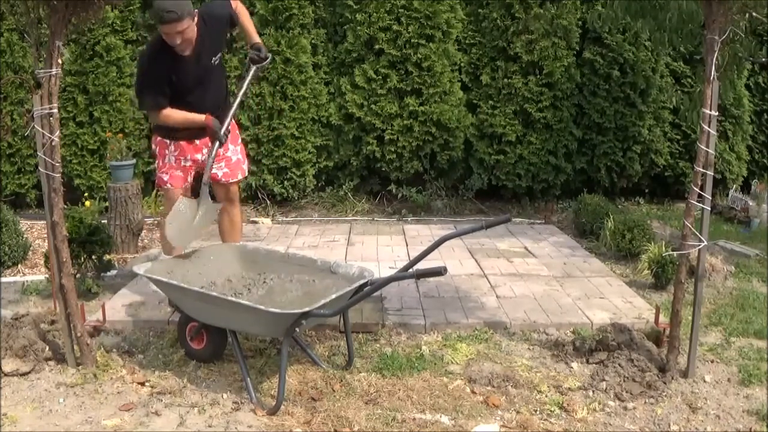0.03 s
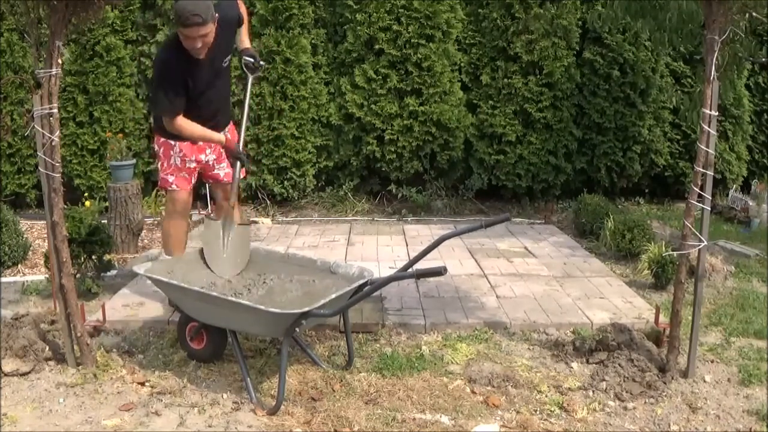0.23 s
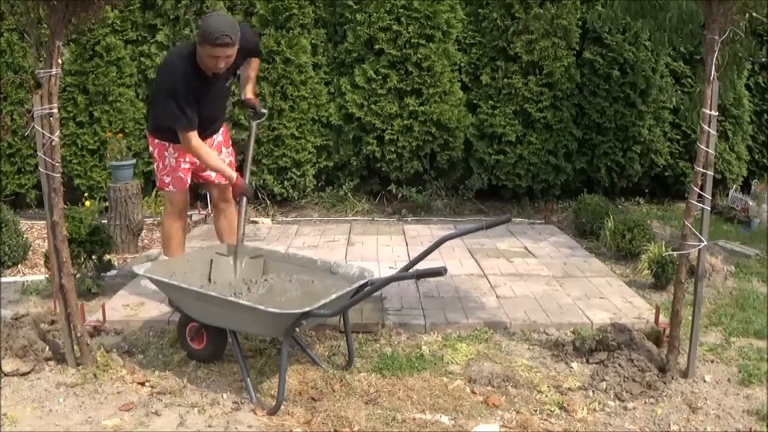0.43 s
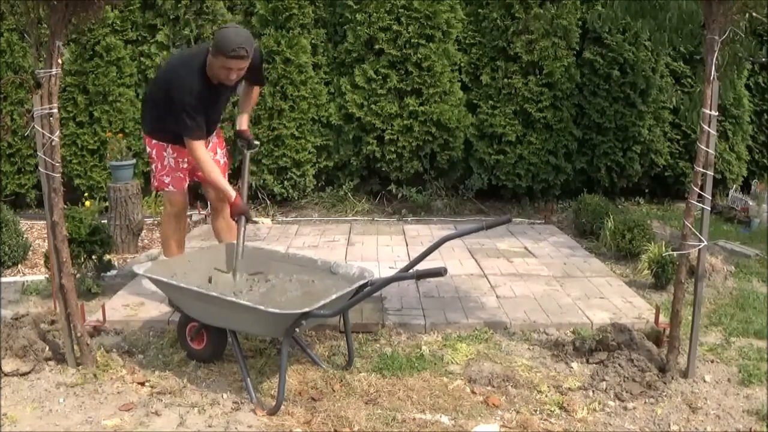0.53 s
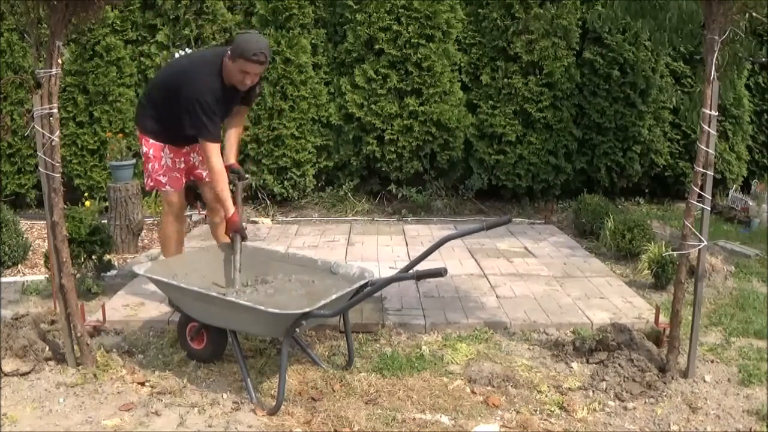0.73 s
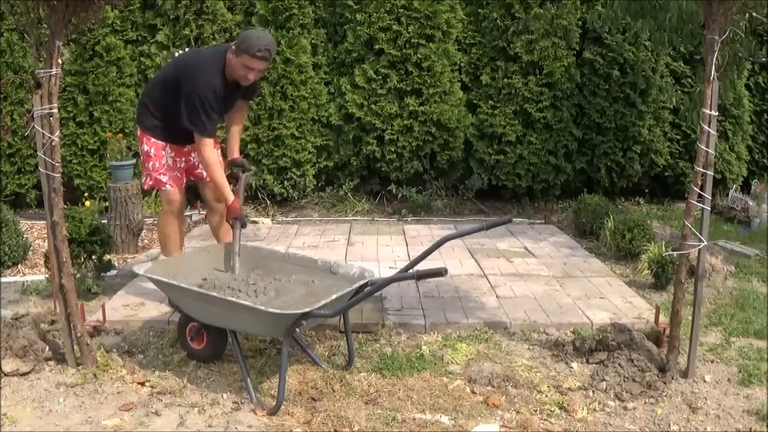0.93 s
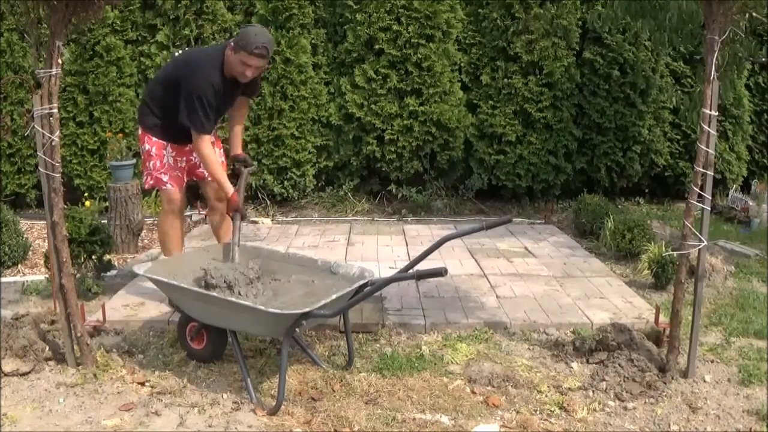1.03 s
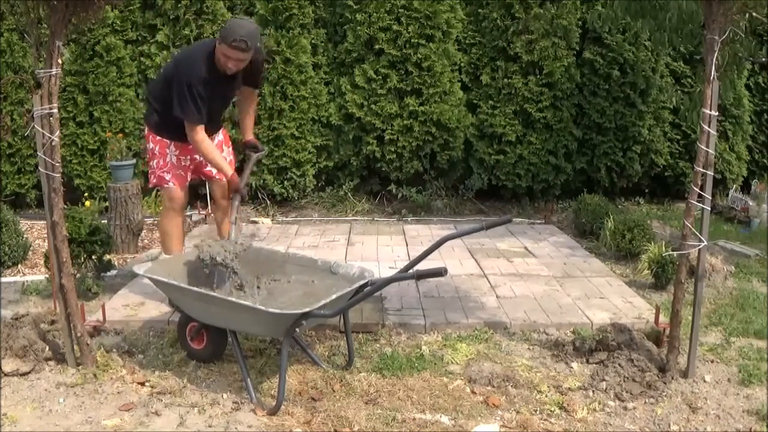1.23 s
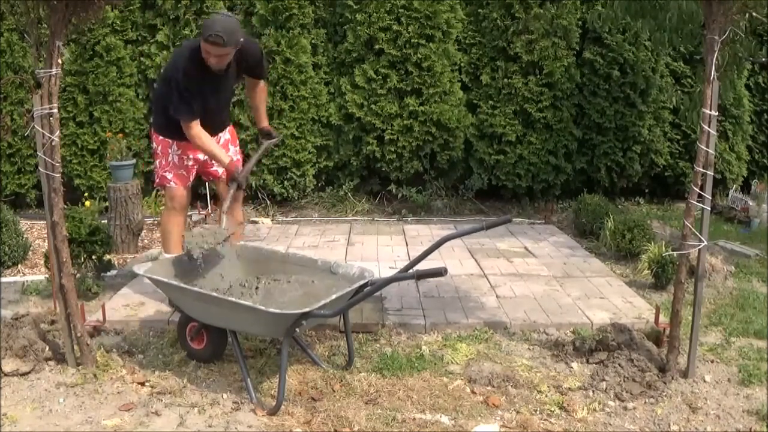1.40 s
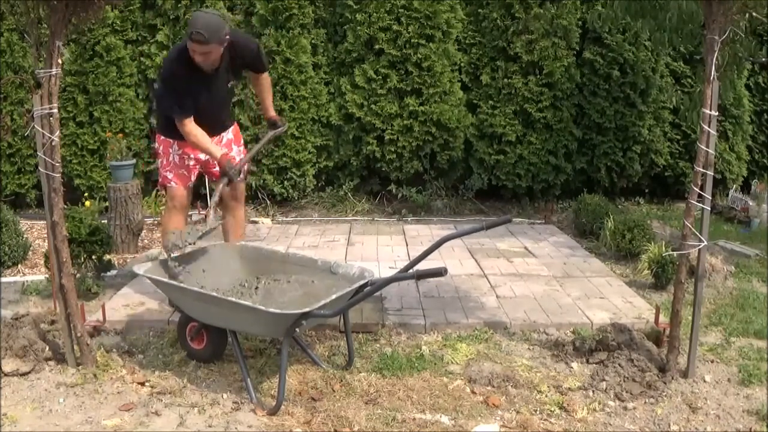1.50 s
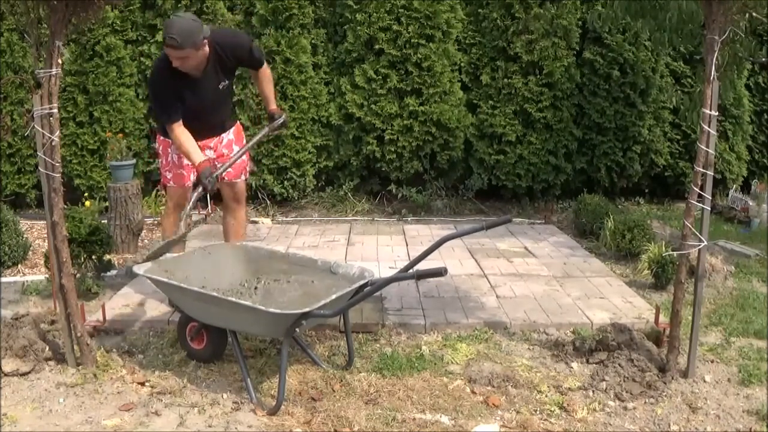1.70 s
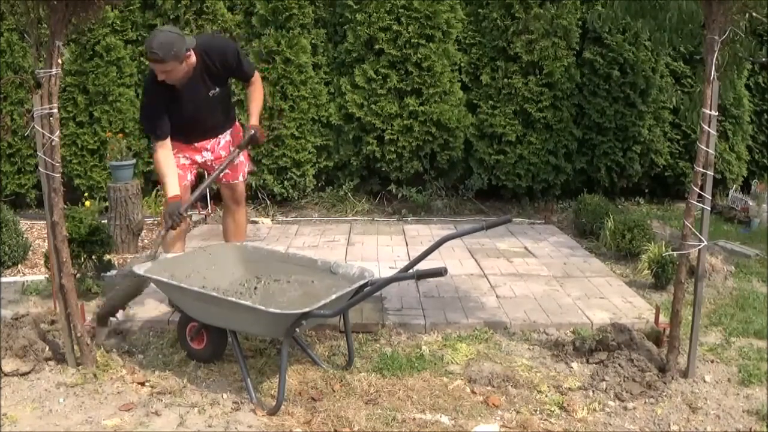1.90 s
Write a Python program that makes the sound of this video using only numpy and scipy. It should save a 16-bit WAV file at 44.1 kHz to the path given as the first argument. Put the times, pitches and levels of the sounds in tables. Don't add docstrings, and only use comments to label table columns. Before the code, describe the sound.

One harsh gravelly shovel thrust with wet plops, a soft sliding pause, then scattered splats and light clanks on a steel wheelbarrow tub, heard from a few metres away in a quiet garden with faint small birds.

```python
import sys
import numpy as np
from scipy import signal
from scipy.fft import rfft, irfft, next_fast_len
from scipy.io import wavfile
from scipy.ndimage import uniform_filter1d, map_coordinates

SR = 44100
rng = np.random.default_rng(int(sys.argv[2]) if len(sys.argv) > 2 else 0)


def voltage_ratio(decibels):
    exponent = np.asarray(decibels, float) / 20
    return 10 ** exponent


def materialize(psi):
    bounded = np.clip(np.atleast_2d(psi).T, -1, 1)
    quanta = np.round(bounded * 32767).astype(np.int16)
    wavfile.write(sys.argv[1], SR, quanta)


N = 85995

# time_s, grinding_db, pocket_over_grinding_db, pocket_pitch_hz
THRUST = [
    (.2165, -25.5, -30, 800),
    (.218, -20, -25, 830),
    (.287, -17.5, -15, 774),
    (.337, -18.5, 2, 770),
    (.351, -27, 6.5, 730),
    (.47, -23.5, 2, 582),
    (.54, -28, 0.5, 558),
    (.69, -30.5, -2.5, 523),
    (.735, -57, -5, 497),
]
# start_s, peak_db, length_s, thud_db, brightness_db
CATCHES = [(.247, -22, 0.036, -28, 8), (.32, -31, 0.0039, -24, 9), (.356, -18.5, 0.0044, -21, -1),
           (.394, -17, 0.005, -5, 3), (.418, -23, 0.0086, -15, -20), (.46, -20, 0.013, -22, -0.2),
           (.493, -22, 0.0043, -13, -5.5), (.512, -30, 0.0089, -15, -12), (.526, -27, 0.019, -11, -2),
           (.5645, -30, 0.0044, -20, -7), (.5875, -26, 0.014, -20, 0), (.657, -30, .015, -21, -17),
           (.68, -29, 0.013, -24, 0)]
# start_s, peak_db, length_s, thud_db, brightness_db
SPLATS = [(.2155, -15, 0.014, -25, 2), (1.258, -43, 0.0037, -20, 3), (1.266, -39, 0.0048, -24, 4),
          (1.325, -35.5, 0.0091, -27, 3), (1.376, -33, 0.0045, -26, 19), (1.388, -35, .003, -13, 16),
          (1.404, -25, 0.0037, -5, -3), (1.451, -36.5, 0.0064, -19, 5), (1.479, -22, 0.0084, 9.5, 0.5),
          (1.494, -31.5, 0.0062, 4, -2), (1.507, -48, 0.01, 14, -2), (1.524, -36.5, 0.017, 1, 1),
          (1.539, -21, 0.012, -5, 0), (1.548, -25, 0.014, -3, -3.5), (1.5765, -25, 0.004, -10, 0),
          (1.59, -27.5, 0.0039, -29, 4), (1.601, -33, 0.0035, -21, -1), (1.646, -28, 0.0057, -3.5, 3),
          (1.654, -17, .0017, -17, 4.5), (1.672, -39, 0.0084, -9, 12), (1.917, -25.5, 0.0014, -26, 14),
          (1.947, -20, .005, -40, 2)]
# start_s, peak_db, pitch_hz, length_s
PLOPS = [(.218, -35.5, 471, 0.016), (.282, -25, 770, 0.043), (.313, -20, 707, 0.0072),
         (.33, -16.5, 823, 0.012), (.356, -21, 840, 0.0042), (.362, -17, 680, 0.009),
         (.379, -19.5, 571, 0.018), (.391, -28, 800, 0.009), (.403, -25, 760, 0.012),
         (.404, -20.5, 1043, 0.016), (.418, -8, 732, 0.0079), (.418, -17.5, 1060, .007),
         (.43, -18, 575, 0.01), (.453, -8.5, 562, 0.011), (.51, -34, 580, 0.017), (.529, -24, 615, 0.011),
         (.587, -24, 497, 0.012), (.6, -31, 720, 0.0087), (.606, -28.5, 374, 0.029),
         (.618, -25, 485, 0.021), (.682, -23.5, 499, 0.016)]
# start_s, peak_db, pitch_hz, length_s
SINGS = [(.002, -53, 1543, 0.022), (.215, -19, 10450, 0.0071), (.215, -19.5, 7410, 0.011),
         (.243, -29, 1830, 0.041), (.286, -19.5, 2124, 0.023), (.308, -16, 4320, 0.013),
         (.31, -26.5, 1670, 0.019), (.352, -18, 2350, .01), (.656, -27.5, 3056, 0.01),
         (.675, -23, 1495, 0.0088), (.755, -46, 1300, 0.026), (.81, -46.5, 1280, 0.045),
         (.815, -46, 4000, .025), (.86, -47, 2340, .06), (.96, -50, 2290, 0.044), (.965, -50, 4370, 0.079),
         (1.01, -51, 3780, .03), (1.06, -51, 1766, 0.053), (1.07, -49, 2610, .035), (1.115, -49, 6270, .04),
         (1.15, -51, 7450, .025), (1.185, -45.5, 6250, .02), (1.215, -45, 7150, 0.018),
         (1.263, -38.5, 4500, 0.011), (1.404, -34, 1720, .008), (1.405, -32, 2270, 0.0053),
         (1.545, -28.5, 1577, 0.011), (1.646, -41, 1800, 0.0066), (1.654, -25, 2980, 0.0049),
         (1.654, -25, 4030, 0.0048), (1.654, -21.5, 6240, 0.003)]
# time_s, level_db, wet_slop_over_it_db, brightness_db
SLIDE = [(.66, -34.5, 1, -5), (.72, -39, -3, -4), (.76, -45, 1.5, -0.5), (.85, -41.5, -2.5, 0.5),
         (.95, -45.5, -1.5, 1), (1.15, -45, -21.5, 5), (1.3, -52, -11.5, 8), (1.62, -53, 0, 4.5),
         (1.74, -58.5, -4.5, 7.5), (1.95, -40.5, -29, 9)]
# time_s, pitch_hz, level_db
SUCK = [
    (.68, 167, -69.5),
    (.84, 139, -64),
    (.92, 121, -70),
    (1.0, 117, -69),
]
# time_s, pitch_hz, level_db
GULP = [
    (.77, 339, -57.5),
    (.82, 301, -61.5),
    (.9, 342, -54),
    (.96, 367, -64),
]
# pitch_hz, level_db (per Hz)
GRIND_COLOUR = [(120, -13.5), (300, -9), (900, -3.5), (1300, -6.5), (2100, -1), (4400, 0.5), (6500, -4),
                (10000, -2.5), (11500, -6.5)]
# pitch_hz, level_db (per Hz)
SAND_COLOUR = [(200, -12), (700, -9), (1900, -0.5), (4000, -6.5), (7000, -9), (11500, -9)]
# pitch_hz, level_db (per Hz)
AIR_COLOUR = [(40, -52), (70, -17), (1450, -8.5), (3550, -4), (8000, -14.5), (11500, -25)]
# pitch_hz, width_hz, level_db
BLADE = [(1660, 35, -3), (1870, 30, 0), (2110, 25, 2), (2450, 60, -3), (4300, 120, -9), (5410, 40, -8)]
# pitch_hz, level_db, fade_by_60_db_s
TUB = [(151, -25.5, .06), (308, -10, 0.027), (460, 4.5, 0.022), (626, -4, 0.023), (718, 5, 0.022),
       (927, -2.5, 0.02), (1167, -2.5, 0.019), (1464, -8, 0.019), (2580, -14, .03)]
# time_s, pitch_hz, level_db
BIRDS = [
    [(0, 4180, -46), (.04, 4210, -56), (.07, 4500, -59), (.12, 4770, -49.5)],
    [(.12, 5270, -58), (.14, 4850, -53)],
    [(.08, 3570, -64), (.157, 3590, -60), (.21, 3690, -51.5)],
    [(.014, 7960, -59), (.024, 8130, -45), (.035, 8140, -63), (.1, 7850, -60), (.115, 7500, -57.5),
     (.135, 7800, -61), (.175, 8200, -60), (.21, 8200, -52.5)],
    [(.085, 2650, -55), (.15, 2650, -61), (.2, 2900, -61)],
    [(1.423, 8020, -56), (1.445, 8200, -46), (1.457, 8260, -63), (1.472, 8150, -44), (1.49, 8150, -53),
     (1.525, 8100, -44)],
    [(1.74, 8130, -59), (1.765, 7130, -55), (1.79, 6470, -45.5), (1.812, 7270, -50), (1.865, 6860, -46),
     (1.897, 7100, -48)],
    [(1.33, 3360, -57), (1.45, 3470, -54)],
]
FLUTTER_HZ = [25, 120, 35, 140, 90, 80, 200, 60]
# pitch_hz, likeness (0 to 1)
BARROW_ALIKE = [(500, 0.99), (3000, 0.98), (10000, 0.94)]
# pitch_hz, likeness (0 to 1)
GARDEN_ALIKE = [(100, 0.66), (10000, 0.65)]

BRIGHT_HZ = 4500


def unit(x):
    return x / np.sqrt(np.mean(x ** 2) + 1e-20)


def along(points, hz):
    f, v = np.transpose(points)
    return np.interp(np.log(hz + 1), np.log(f + 1), v)


def curves(rows):
    s, *columns = np.transpose(rows)
    t = np.arange(N) / SR
    inside_s = np.minimum(t - s[0] + 0.0055, s[-1] - t + 0.0038)
    gate = np.clip(inside_s / 0.0054, 0, 1)
    return [gate] + [np.interp(t, s, column) for column in columns]


def wobble(rate):
    knots = rng.standard_normal(int(N * rate / SR) + 4)
    return map_coordinates(knots, [np.arange(N) * rate / SR])


def filtered(x, response):
    m = next_fast_len(N + SR // 2)
    return irfft(rfft(x, m) * response(np.fft.rfftfreq(m, 1 / SR)), m)[..., :N]


def bright_part(x):
    return filtered(x, lambda f: 1 / (1 + (BRIGHT_HZ / (f + 1)) ** 4))


def dull_part(x):
    return filtered(x, lambda f: 1 / (1 + (f / BRIGHT_HZ) ** 4))


def ringing(peaks):
    def response(f):
        return sum((-1) ** k * voltage_ratio(db) * 1j * f * width / (hz * hz - f * f + 1j * f * width)
                   for k, (hz, width, db) in enumerate(peaks))
    return response


def grit(colour, lumpy_db, patchy_db):
    z = signal.stft(rng.standard_normal(N + 512), nperseg=256)[2]
    patches = uniform_filter1d(rng.standard_normal(z.shape), size=5, axis=0)
    patches = uniform_filter1d(patches, size=5, axis=1)
    noise = signal.istft(z * voltage_ratio(patchy_db * unit(patches)), nperseg=256)[1][:N]
    clumps = voltage_ratio(lumpy_db * (wobble(700) + 0.71 * wobble(89.6)))
    return unit(filtered(noise, lambda hz: voltage_ratio(along(colour, hz))) * clumps)


def gurgle(hz, count, cycles, scatter, size_db):
    u, t = rng.random((count, 2)), np.arange(1200) / SR
    at = (u[:, 0] * (N - 1)).astype(int)
    f = (hz[at] * np.exp(scatter * rng.standard_normal(count)))[:, None]
    size = voltage_ratio(-size_db * np.log(u[:, 1:2] + 1e-4))
    age = f * t / cycles
    tone = size * age * np.exp(-age) * np.sin(2 * np.pi * f * t)
    places = at[:, None] + np.arange(1200)
    return unit(np.bincount(places.ravel(), tone.ravel())[:N])


def thrust():
    gate, db, pocket_db, pocket_hz = curves(THRUST)
    grind = grit(GRIND_COLOUR, lumpy_db=1.4, patchy_db=1.25)
    free = np.clip((0.373 - np.arange(N) / SR) / 0.018, 0.2, 1)
    blade = voltage_ratio(-9) * free * unit(filtered(grind, ringing(BLADE)))
    pocket = gurgle(pocket_hz, count=2200, cycles=2.6, scatter=0.08, size_db=1.5)
    overtone = gurgle(1.74 * pocket_hz, count=1500, cycles=1.42, scatter=0.302, size_db=2.0)
    pocket = pocket + voltage_ratio(-2) * overtone
    return gate * voltage_ratio(db) * (grind + squeaks() + blade + voltage_ratio(pocket_db - 4) * pocket)


def squeaks():
    return voltage_ratio(-7) * gurgle(np.full(N, 3600.), count=1100, cycles=8, scatter=0.5, size_db=1.8)


def tones(rows, wander):
    out, drift = np.zeros(N + SR), wobble(160)
    swell = 0.36
    for s, db, hz, length in rows:
        i = round(s * SR)
        u = np.arange(round(2 * length * SR)) / (SR * length * swell)
        phase = 2 * np.pi * np.cumsum(hz * (1 + wander * drift[i:i + len(u)])) / SR
        out[i:i + len(u)] += voltage_ratio(db) * (u * np.exp(1 - u)) ** 1.16 * np.sin(phase)
    return out[:N]


def bursts(rows):
    t, out = np.arange(SR // 10) / SR, np.zeros(N + SR)
    crunch = grit(GRIND_COLOUR, lumpy_db=2.2, patchy_db=1.8)
    high, low = bright_part(crunch), dull_part(crunch)
    for k, (s, db, length, thud_db, bright_db) in enumerate(rows):
        i = round(s * SR)
        part = slice(k * 2500, k * 2500 + len(t))
        tail_s = 0.029 * (length / 0.0042) ** 0.5
        rise = 1 - np.exp(-t / 0.0003)
        shape = rise * voltage_ratio(-60 * np.maximum(t - 0.71 * length, 0) / tail_s)
        shape = shape * (1 + voltage_ratio(-0.5) * np.exp(-t / 0.00013))
        mix = low[part] * voltage_ratio(-bright_db) + high[part] * voltage_ratio(bright_db)
        mix = mix * np.linalg.norm(shape) / np.linalg.norm(shape * mix)
        out[i:i + len(t)] += voltage_ratio(db) * (shape * mix + voltage_ratio(thud_db) * tub(t))
    return out[:N]


def tub(t):
    rings = sum(voltage_ratio(db + rng.normal(0, 1) - 60 * t / t60) * np.sin(2 * np.pi * hz * t)
                for hz, db, t60 in TUB)
    return rings * (1 - np.exp(-t / 0.0012))


def slide():
    gate, db, slop_db, bright_db = curves(SLIDE)
    slop = gurgle(np.full(N, 800.), count=1500, cycles=3.3, scatter=0.548, size_db=-1.0)
    sand = grit(SAND_COLOUR, lumpy_db=2.0, patchy_db=1.0)
    sand = sand + (voltage_ratio(bright_db) - 1) * bright_part(sand)
    return gate * voltage_ratio(db + 0.58 * wobble(14.9)) * (sand + 0.56 * squeaks() + voltage_ratio(slop_db) * slop)


def whistle(rows, flutter_hz, rate):
    gate, hz, db = curves(rows)
    phase = 2 * np.pi * np.cumsum(hz + flutter_hz * wobble(rate)) / SR
    return gate * voltage_ratio(db + 3.5 + flutter_hz / 60 * wobble(rate)) * np.sin(phase)


def birds():
    return sum(whistle(rows, flutter, 450) for rows, flutter in zip(BIRDS, FLUTTER_HZ))


def garden_air():
    return voltage_ratio(-50.5 + 1.8 * wobble(6.4)) * grit(AIR_COLOUR, lumpy_db=0.6, patchy_db=0.5)


def yard(x):
    t = np.arange(SR // 4) / SR
    tail = rng.standard_normal((2, len(t))) * voltage_ratio(-60 * t / 0.13)
    late = np.pad(x, (300, 0))[None]
    return signal.fftconvolve(late, tail / np.linalg.norm(tail[0]), axes=1)[:, :N]


def left_right(x, alike):
    def difference(hz):
        angle = np.arccos(np.clip(along(alike, hz), 0, 1))
        return 1.4j * np.cos(hz / 70) * np.tan(angle / 2)
    side = filtered(x, difference)
    return np.array([x + side, x - side])


def low_cut(x):
    return filtered(x, lambda f: (1j * f / (317 + 1j * f)) ** 2)


def scene():
    shovel = thrust() + bursts(CATCHES) + bursts(SPLATS)
    shovel = shovel + tones(PLOPS, wander=0.032) + tones(SINGS, wander=0.014)
    shovel = low_cut(shovel)
    mix = low_cut(slide()) + whistle(SUCK, 8.4, 40.9) + whistle(GULP, 19.0, 70.3)
    calls = birds()
    near = left_right(shovel, BARROW_ALIKE) * voltage_ratio([[0.55], [-0.55]]) + left_right(mix, BARROW_ALIKE)
    echoes = voltage_ratio(-16) * yard(shovel + mix) + voltage_ratio(-6) * yard(calls)
    return near + left_right(garden_air() + calls, GARDEN_ALIKE) + echoes


def top_cut(x):
    return signal.sosfilt(signal.butter(12, 11940, fs=SR, output="sos"), x)


def record(dry):
    limited = filtered(dry, lambda hz: np.clip((11110 - hz) / 70, 0, 1) ** 2)
    return top_cut(limited)


dry = scene()
out = record(dry)
materialize(out)
```